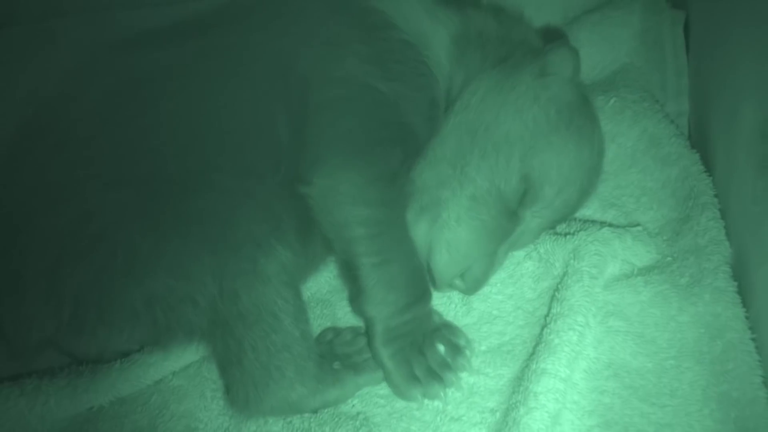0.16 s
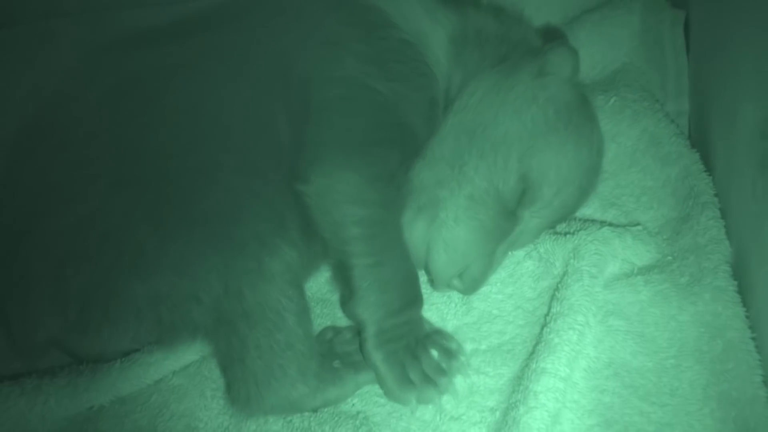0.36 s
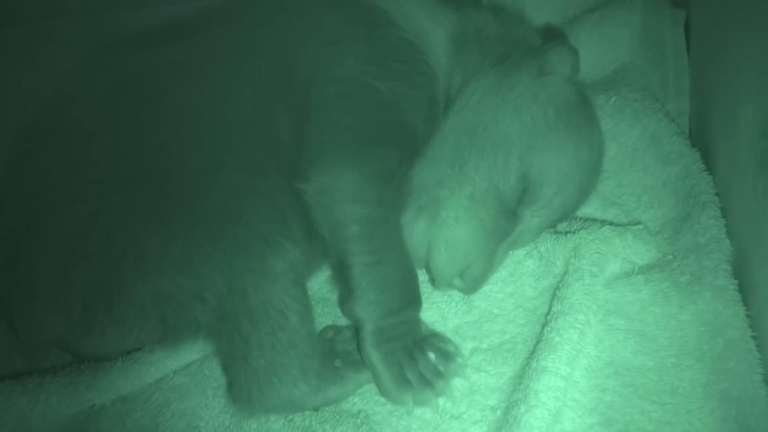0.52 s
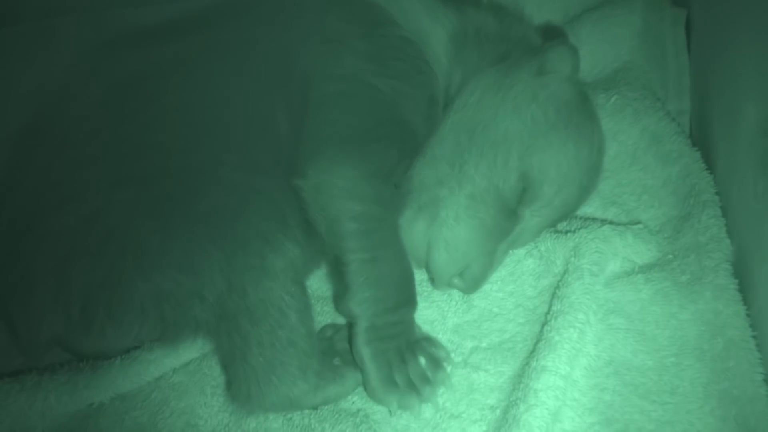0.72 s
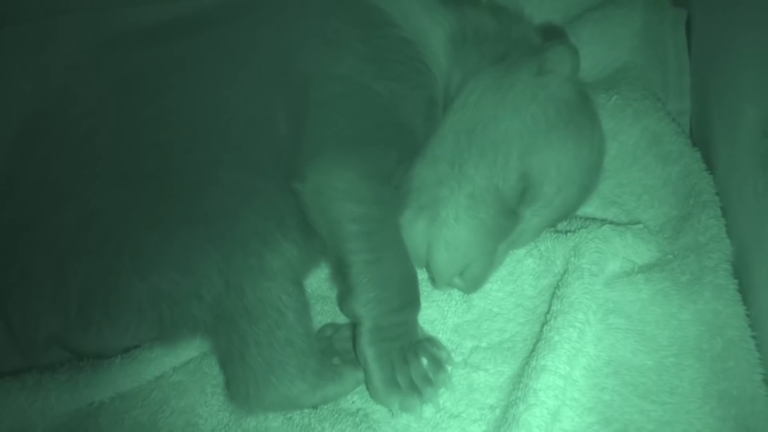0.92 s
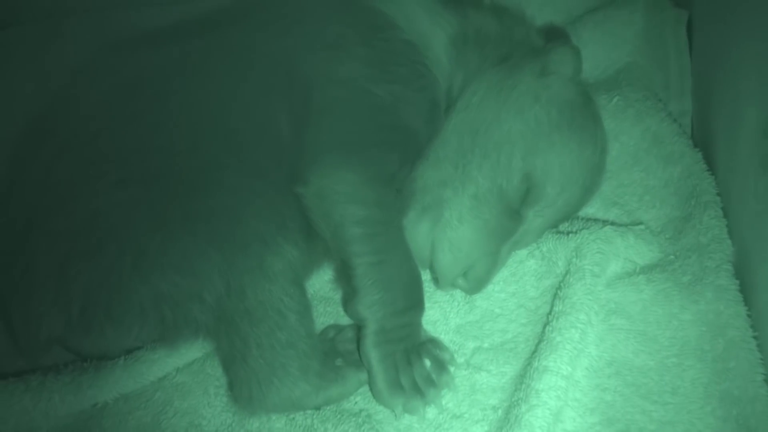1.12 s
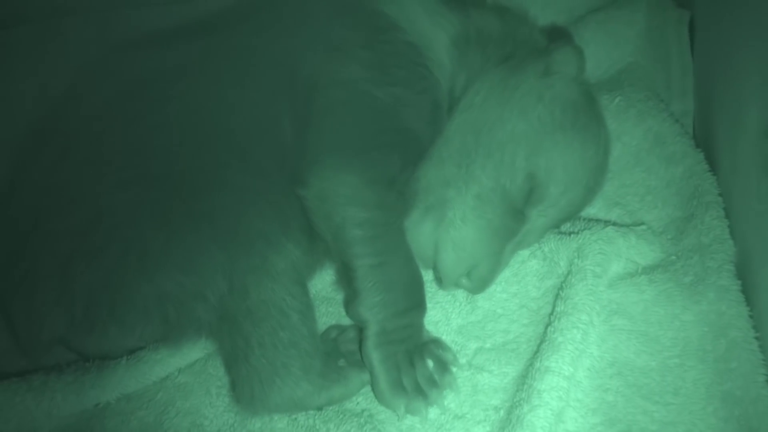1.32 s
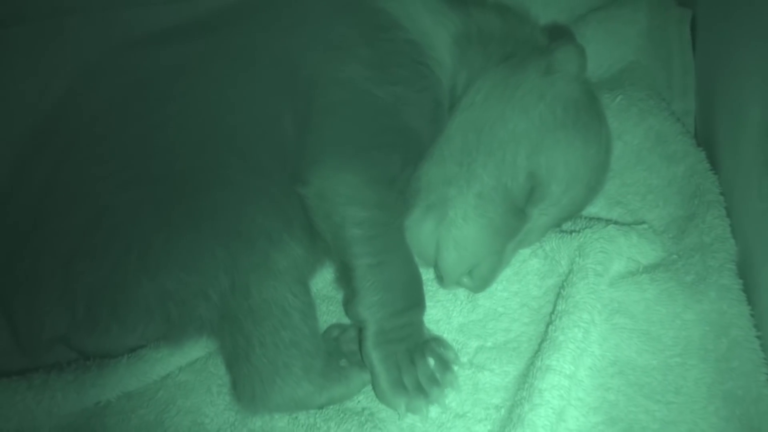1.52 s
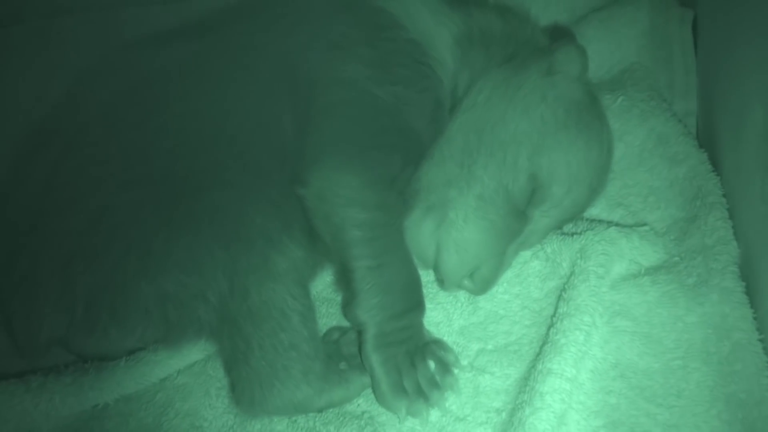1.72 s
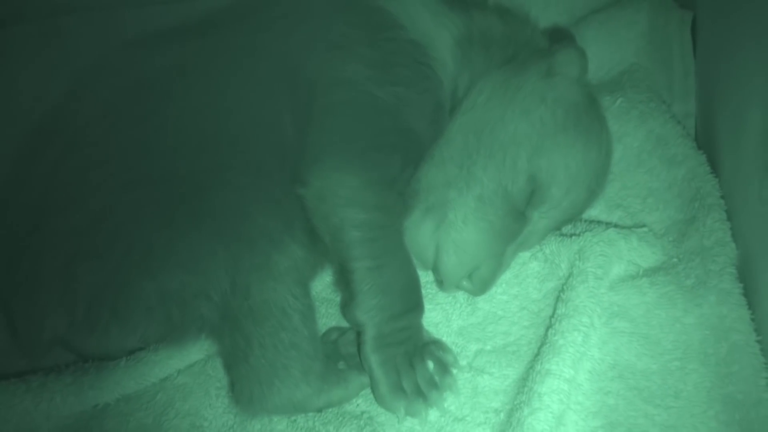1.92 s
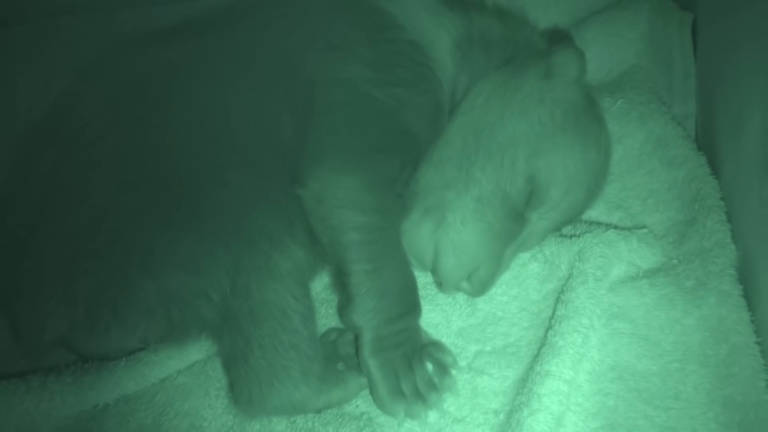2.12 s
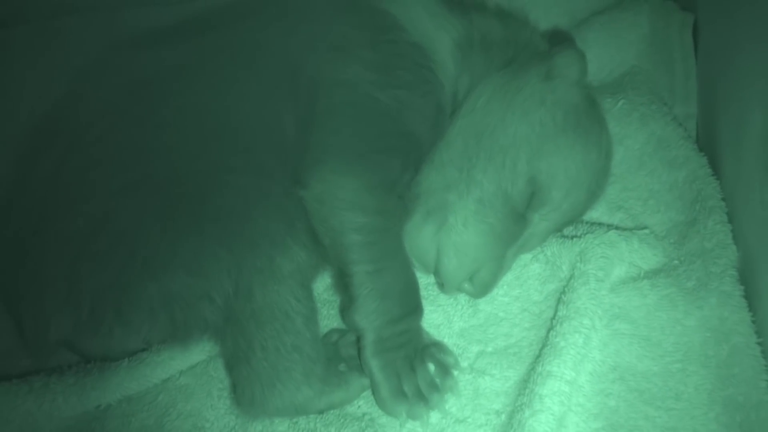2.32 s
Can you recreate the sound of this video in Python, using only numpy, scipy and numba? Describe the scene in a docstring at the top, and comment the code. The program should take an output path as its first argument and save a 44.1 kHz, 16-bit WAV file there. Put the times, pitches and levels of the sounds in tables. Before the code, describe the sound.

A bear cub, close and slightly right, starts with a thin, unsteady whistling squeal from 0 to 0.5 s, cracking hoarsely. It bursts into a louder, nasal, wavering wail, which sinks into a pulsing growl after 1.05 s and dies by 1.4 s. Soft low paw thumps come near 1.1, 1.45, 1.9 and 2.3 s, with faint fur brushing, over quiet room hiss and whine.

```python
"""Bear cub crying in a padded den box

A thin squeal, built from sines, is joined by a higher second tone and the mixing products of the two.
A rough, wavering wail takes over, drops in pitch and dies: uneven harmonics and pulsed breath in vocal bands.
Paws thump the box floor as short low sine bursts with noise tails; filtered noise brushes by as fur.
Shaped noise gives hiss and rumble, narrow noise a faint machine whine. The cub sits close, off to the right.
"""
import sys
import numpy as np
from scipy import signal
from scipy.fft import rfft, irfft
from scipy.io import wavfile
from scipy.ndimage import uniform_filter1d
from numba import njit

SR = 44100
rng = np.random.default_rng(int(sys.argv[2]) if len(sys.argv) > 2 else 0)


def wav_out(sig):
    """Save sig, one row per channel (or a flat mono array), as 16-bit PCM at SR to the path in sys.argv[1]."""
    wavfile.write(sys.argv[1], SR, np.round(np.clip(np.atleast_2d(sig).T, -1, 1) * 32767).astype(np.int16))


N = 103635

# Pitch of the wail. Each row: time in seconds, pitch in Hz.
WAIL_PITCH = [(0.44, 344.4), (0.468, 334.7), (0.518, 312.3), (0.54, 283.5), (0.57, 259.8), (0.6, 281.5),
              (0.624, 286.3), (0.674, 282.2), (0.7, 237.3), (0.736, 262.4), (0.794, 279.9), (0.814, 305.9),
              (0.83, 280), (0.852, 293), (0.914, 301.7), (0.996, 291.9), (1.018, 287), (1.048, 271.4),
              (1.052, 260.4), (1.072, 185.1), (1.086, 176.1), (1.148, 184.9), (1.194, 163.2), (1.23, 165.4),
              (1.265, 156.7), (1.3, 139.1), (1.36, 111)]
# Strong-weak pulses of the growl. Each row: time in seconds, level of the odd partials in dB, mouth width in Hz.
GROWL = [(1.05, 1.5, 310), (1.075, 4, 170), (1.15, -5.5, 176), (1.185, -4.5, 150), (1.25, -5.5, 204.6),
         (1.29, 1.5, 350)]
PATCHY_DB = 2.2  # flicker of the upper partials


def undb(db):
    """Decibels to gain."""
    return 10 ** (np.asarray(db) / 20)


def curve(table, col=1):
    """One column of a time table, interpolated per sample."""
    a = np.array(table, float)
    return np.interp(np.arange(N) / SR, a[:, 0], a[:, col])


def gate(table, fade_s=.004):
    """1 inside the time span of a table, fading to 0 outside."""
    t = np.arange(N) / SR
    inside_s = np.minimum(t - table[0][0], table[-1][0] - t)
    return np.clip(inside_s / fade_s + 1, 0, 1)


def even(x, span_s=0.03):
    """Holds a sound near rms 1 over time."""
    k = int(span_s * SR)
    power = uniform_filter1d(uniform_filter1d(x ** 2, k), k)
    return x / np.sqrt(power + 1e-12)


def noise():
    """White noise."""
    return rng.standard_normal(N)


def walk(rate_hz):
    """Random wander: random steps smoothed over one step length."""
    k = int(SR / rate_hz)
    steps = np.repeat(rng.standard_normal(N // k + 1), k)
    return 1.3 * uniform_filter1d(steps, k)[:N]


def on_log(table, hz):
    """Reads a (Hz, dB) table on a log frequency axis."""
    a = np.array(table, float)
    return np.interp(np.log(hz), np.log(a[:, 0]), a[:, 1])


def pan(x, left_minus_right_db):
    """Places a sound by level difference."""
    g = undb(np.array([[left_minus_right_db / 2], [-left_minus_right_db / 2]]))
    return x * g / g.mean()


@njit
def svf(x, hz, width):
    """State-variable band-pass with moving centre, gain 1 there."""
    y, b, l = np.empty(len(x)), 0., 0.
    for i in range(len(x)):
        g, k = np.tan(np.pi * hz[i] / SR), width / hz[i]
        v = (b + g * (x[i] - l)) / (1 + g * (g + k))
        b, l, y[i] = 2 * v - b, l + 2 * g * v, k * v
    return y


def band(x, hz, width_hz):
    """Band-pass at a fixed or moving centre."""
    return svf(x, hz + np.zeros(N), float(width_hz))


def edges(x, lo_hz, hi_hz, order=4):
    """Butterworth band-pass between fixed edges."""
    return signal.sosfilt(signal.butter(order, [lo_hz, hi_hz], "band", fs=SR, output="sos"), x)


def peak(f, hz, width_hz):
    """Gain of a resonance at frequency f."""
    return 1 / np.sqrt(1 + (2 * (f - hz) / width_hz) ** 2)


def cut(f, hz):
    """Gain that falls steeply above hz."""
    return 1 / (1 + (f / hz) ** 14)


def room_tone():
    """Stereo hiss and rumble from spectrally shaped noise, plus a narrow-band machine whine."""
    # Spectrum of the middle. Each row: frequency in Hz, relative density in dB.
    floor = [(15, -32), (25, -21), (59, 4), (275, -11.5), (314, -0.5), (380, -13), (525, -7), (786, -19),
             (1090, -8.5), (1210, -18.5), (1540, -13), (1720, -18), (1960, -17), (3020, -22),
             (15600, -25.5)]
    # Side against middle. Each row: frequency in Hz, level in dB.
    side_db = [(60, -29), (110, -7), (200, -1), (380, -4.5), (700, 4.5), (1290, -6.5), (2380, -8.5),
               (4400, -9.5), (8120, -1), (11000, -6), (12000, -34.5)]
    # Machine whine. Each row: centre in Hz, width in Hz, level in dB.
    hums = [(1084, 42, -68)]
    floor_db, hum_pan_db = -64.5, 1.8
    f = np.maximum(np.fft.rfftfreq(N, 1 / SR), 1)
    floor_shape_db = on_log(floor, f)
    mid = irfft(rfft(noise()) * undb(floor_shape_db), N)
    side = irfft(rfft(noise()) * undb(floor_shape_db + on_log(side_db, f)), N)
    bed = (mid + side * np.array([[1], [-1]])) * undb(floor_db) / np.std(mid)
    whine = np.zeros(N)
    for hz, width_hz, db in hums:
        narrow = band(band(noise(), hz, width_hz), hz, 2 * width_hz)
        whine += undb(db + 2.0 * walk(9.5)) * even(narrow, 0.76)
    return bed + pan(whine, hum_pan_db)


def rustles():
    """Fur brushing the blanket: band noise that swells and dies."""
    # Each row: start in seconds, peak level in dB, centre in Hz, width in Hz, length in seconds.
    brushes = [(1.458, -65, 1490, 480, 0.077), (1.884, -61.5, 1530, 50, 0.045),
               (2.07, -70, 2820, 1000, 0.062)]
    t, out = np.arange(N) / SR, np.zeros(N)
    for start_s, db, hz, width_hz, length_s in brushes:
        u = np.maximum(t - start_s, 0) / length_s
        swell = np.e * u * 4 * np.exp(-4 * u)  # reaches 1 at a quarter of the length
        out += undb(db) * swell * even(band(noise(), hz, width_hz), 0.091)
    return out


def squeak():
    """A faint, very high sine whose pitch and level arch up and down."""
    middle_s, half_length_s, level_db = 2.085, .09, -79
    top_hz, end_drop_hz = 11800, 650
    u = np.clip((np.arange(N) / SR - middle_s) / half_length_s, -1, 1)
    phase = np.cumsum(top_hz - end_drop_hz * u ** 2) / SR
    return undb(level_db) * (1 - u ** 2) * np.sin(2 * np.pi * phase)


def thumps():
    """Soft paw blows: a couple of low sine cycles, then a decaying low noise tail of the box."""
    # Each row: start in seconds, level in dB, pitch in Hz.
    blows = [(1.003, -46, 111), (1.112, -36.5, 105), (1.451, -34.5, 105), (1.483, -46, 123.5),
             (1.9, -39.5, 118), (1.936, -52, 94), (1.955, -42, 121), (2.328, -40, 116)]
    rise_s, fall_s = .012, .008
    tail_db, tail_rise_s, tail_t60_s = -14.5, 0.013, 0.28
    out, tail_level, t = np.zeros(N), np.zeros(N), np.arange(N) / SR
    for start_s, db, hz in blows:
        u = np.maximum(t - start_s, 0)
        rise = np.sin(np.pi / 2 * u / rise_s)
        fall = np.exp(-((u - rise_s) / fall_s) ** 2 / 2)
        out += undb(db) * np.where(u < rise_s, rise, fall) * np.sin(2 * np.pi * hz * u)
        tail_level += undb(db) * (1 - np.exp(-u / tail_rise_s)) * undb(-60 * u / tail_t60_s)
    return out + undb(tail_db) * tail_level * even(edges(noise(), 40, 85, order=1), 0.22)


def tone(hz):
    """A slightly wavering sine, coloured by head and box, flickering more at high pitch."""
    # Response of head and box. Each row: frequency in Hz, gain in dB.
    head = [(1000, 0), (2200, -3), (2700, -14), (3300, -32), (3900, -18), (5000, -14), (5800, -7.5),
            (6350, -21.5), (6750, -19.5), (7300, -52), (9000, -49)]
    flicker_db = PATCHY_DB * np.clip(hz / 2000 - 1, 0, 1) * walk(31.6)
    phase = np.cumsum(hz * (1 + 0.0013 * walk(61.8))) / SR
    return np.sqrt(2) * undb(on_log(head, hz) + flicker_db) * np.sin(2 * np.pi * phase)


def squeal():
    """A high whistle of the folds, a second tone above it, their mixing products and a faint wheeze."""
    # Whistle, second tone and wheeze. Each row: time in seconds, pitch in Hz, level in dB.
    whistle, second, wheeze = [(0.07, 1655, -41), (0.078, 1693, -43), (0.138, 1668, -43),
                               (0.214, 1610, -32), (0.246, 1466, -41), (0.3, 1351, -32.5),
                               (0.346, 1329, -35.5), (0.354, 1286, -32.5), (0.364, 1286, -41),
                               (0.394, 1383, -35.5), (0.414, 1438, -40.5), (0.438, 1427, -36),
                               (0.468, 1380, -38.5), (0.48, 1210, -43), (0.49, 1340, -49)], [(0.13, 1953, -55.5), (0.158, 2097, -50.5),
                                               (0.21, 2090, -52.5), (0.244, 1933, -34.5),
                                               (0.27, 1786, -43.5), (0.34, 1629, -41), (0.374, 1680, -47),
                                               (0.418, 1782, -43), (0.456, 1744, -42), (0.498, 1596, -33.5),
                                               (0.51, 1468, -41)], [(0, 1246, -59.5), (.05, 1300, -54),
                                                               (.07, 1257, -58.5), (.24, 1326, -55.5),
                                                               (.28, 1300, -47)]
    # Level of each harmonic in dB, from the fundamental up.
    whistle_db, wheeze_db = [0.5, -9, -12, -20.5, -15], [-4, -6, -5, -11.5]
    # Level of high partials and mixing products. Each row: time in seconds, level in dB.
    clear_db = [(.2, 0), (.25, -4), (.29, 1), (.342, 1), (.356, -9), (.39, -7), (.405, 2), (.45, 1),
                (.48, -6)]
    # Noise in the second tone. Each row: time in seconds, share 0-1.
    second_fuzz = [(.14, .8), (.165, .12), (.34, .1), (.36, .7), (.39, .1)]
    whistle_noise_db, mixing_db, blur_db = -33, -17, -29
    hz, level = curve(whistle), undb(curve(whistle, col=2)) * gate(whistle, 0.00071)
    upper_hz, upper_level = curve(second), undb(curve(second, col=2)) * gate(second, 0.03)
    clear, fuzz = undb(curve(clear_db)), curve(second_fuzz)

    harmonics = sum(undb(db) * tone(k * hz) * (clear if k > 1 else 1) for k, db in enumerate(whistle_db, 1))
    out = level * (harmonics + undb(whistle_noise_db) * even(band(noise(), hz, 330)))
    fuzzy = even(band(band(noise(), upper_hz, 250), upper_hz, 270))
    out = out + upper_level * (np.sqrt(1 - fuzz ** 2) * tone(upper_hz) + fuzz * fuzzy)
    orders = [(2, 1), (1, 2), (3, 1), (0, 3), (2, 2)]  # multiples of whistle and second tone
    mixing = sum(tone(a * hz + b * upper_hz) for a, b in orders)
    blur = even(edges(noise(), 4200, 6000, order=2))
    out = out + upper_level * (undb(mixing_db) * clear * mixing + undb(blur_db) * blur)
    faint = sum(undb(db) * tone(k * curve(wheeze)) for k, db in enumerate(wheeze_db, 1))
    return out + faint * undb(curve(wheeze, col=2)) * gate(wheeze, 0.021)


def beating():
    """The whistle returns inside the wail: narrow noise chopped at the wail's pitch, unsteady in level."""
    # Each row: time in seconds, centre in Hz, level in dB.
    whistle_again = [(.53, 1402, -43), (.57, 1401, -42), (.59, 1292, -35), (.605, 1388, -42),
                     (.625, 1468, -41), (.7, 1315, -45.5), (.885, 1315, -43), (.91, 1278, -39),
                     (.945, 1374, -36.5), (.958, 1320, -40), (.975, 1258, -40), (1.005, 1246, -38.5),
                     (1.04, 1280, -43)]
    chop = 1 + np.cos(2 * np.pi * np.cumsum(curve(WAIL_PITCH)) / SR)
    level = undb(curve(whistle_again, col=2) + 2.0 * walk(56.65)) * gate(whistle_again, 0.044)
    return chop * even(band(noise(), curve(whistle_again), 22)) * level


def hoarse_break(puff):
    """The voice breaks inside the squeal: pulsed breath in two bands over a low noise groan."""
    # Each row: time in seconds, level in dB.
    break_db = [(.3, -68), (.325, -58.5), (.345, -52), (.356, -49.5), (.39, -51), (.402, -68), (.43, -68),
                (.45, -53)]
    groan_db, hiss_db = -4, -13
    rasp = even(edges(puff, 610, 2000, order=2))
    hiss = undb(hiss_db) * even(edges(puff, 3500, 4800, order=2))
    groan = undb(groan_db) * even(edges(noise(), 112.5, 142, order=2), .1)
    return (rasp + hiss + groan) * undb(curve(break_db)) * gate(break_db, 0.024)


def wail_partials(k, f, phase, halved, odd_db):
    """Harmonics of the vocal pulses with frequency-dependent lag; they drift and flicker separately."""
    throat_lag_rad, growl_scatter_rad = 1.3, 1.3  # throat lag at 1 kHz
    drift = np.array([walk(12) for _ in k]) * np.clip(f / 700, 0, 1)
    lag = throat_lag_rad * np.minimum(f / 1000, 2) ** 2
    lag = lag + growl_scatter_rad * np.maximum(halved, .15) * drift
    lines = -np.cos(2 * np.pi * k * phase - lag) * undb(odd_db * (k % 2))
    flicker = np.array([walk(40) for _ in k])
    return lines * undb(PATCHY_DB * np.clip(f / 1000 - .5, .2, 1) * flicker)


def wail():
    """Uneven vocal pulses and pulsed breath through chest, mouth, nose, treble and air bands."""
    # Each row: time in seconds, chest level in dB, mouth resonance in Hz, mouth level in dB.
    wail_low = [(0.32, -70, 980, -84), (0.366, -50, 990, -49.5), (0.394, -47, 970, -62),
                (0.424, -70, 674, -66.5), (0.462, -77.5, 700, -35), (0.504, -30, 940, -30),
                (0.524, -26.5, 875, -29.5), (0.537, -28.5, 870, -29.5), (0.545, -39.5, 845, -43.5),
                (0.56, -40, 590, -37.5), (0.578, -44.5, 690.4, -47.5), (0.605, -42, 880, -41),
                (0.62, -38.5, 850, -38.5), (0.65, -37.5, 810, -36.5), (0.698, -38, 566, -37),
                (0.74, -40.5, 845, -46.5), (0.78, -32.5, 820, -41.5), (0.804, -31.5, 840, -28.5),
                (1.016, -32.5, 717, -27), (1.038, -30.5, 696, -35.5), (1.072, -32, 840, -30),
                (1.114, -33.5, 1000, -28.5), (1.145, -30.5, 1030, -31), (1.18, -30.5, 645, -29.5),
                (1.226, -25.5, 620, -27.5), (1.27, -27.5, 684, -34), (1.35, -47, 584.5, -57.5),
                (1.39, -66.5, 700, -62.5)]
    # Each row: time in seconds, nose level in dB, nose resonance in Hz, treble level in dB.
    wail_high = [(0.44, -47.5, 1420, -61.5), (0.49, -36.5, 1490, -57.5), (0.56, -36, 1360, -55.5),
                 (0.58, -42, 1320, -64), (0.63, -32.5, 1440, -58), (0.708, -36, 1260, -60.5),
                 (0.784, -30.5, 1360, -58), (0.802, -38.5, 1360, -56.5), (0.88, -40, 1550, -56),
                 (0.986, -42, 1340, -53), (1.052, -35, 1330, -52.5), (1.084, -38.5, 1370, -59.5),
                 (1.14, -36, 1171, -55.5), (1.18, -34, 1070, -65.5), (1.228, -34.5, 989, -55.5),
                 (1.252, -33.5, 980, -67), (1.3, -52.5, 1010, -74), (1.39, -67, 1530, -80)]
    # Upper nasal resonance. Each row: time in seconds, relative level in dB, centre in Hz.
    upper_nose = [(.44, -18, 1940), (.55, -2.5, 1910), (.6, -17, 2020), (.66, -9.5, 1960),
                  (.79, -10.5, 1900), (.835, -0.5, 2030), (.86, 5, 1760), (1.0, -5, 1900), (1.04, -7, 1930),
                  (1.12, -7.5, 1930), (1.16, -8, 1890), (1.2, -2, 1700), (1.3, -5, 1560)]
    # Air band. Each row: time in seconds, level in dB.
    air_db = [(.44, -84), (.55, -78), (.8, -68), (1.25, -67), (1.39, -74.5)]
    # Each row: time in seconds, roughness 0-1.
    roughness = [(.34, .9), (.44, .6), (.455, .3), (.474, .35), (.488, .85), (.505, .08), (.55, .15),
                 (.575, .8), (.605, .8), (.62, .12), (.68, .1), (.692, .75), (.715, .06), (.85, .07),
                 (1.04, .08), (1.06, .7), (1.09, .2), (1.135, .15), (1.155, .5), (1.19, .15), (1.24, .15),
                 (1.275, .6), (1.36, .75)]
    jitter, shimmer_db = .05, 4.0  # pitch share and level spread at full roughness
    halved_hz, half_bass_db = 205, -14  # strong and weak pulses alternate under this pitch
    chest_min_hz, chest_width_hz, mouth_width_hz, nose_width_hz = 331, 63, 450, 95
    mouth_top_hz, nose_top_hz = 1080, 2393
    nose_breath, treble_breath = .06, .6  # shares 0-1; the nose adds its own to the roughness
    rumble_db = -29  # the body shakes the box floor, relative to the chest

    hz, rough = curve(WAIL_PITCH), curve(roughness)
    phase = np.cumsum(hz * (1 + jitter * rough * walk(200))) / SR
    shimmer = undb(shimmer_db * rough * walk(180))
    puff = np.exp(-(phase % 1) / 1.4) * noise()  # breath decays within each pulse
    k = np.arange(1, 45)[:, None]
    f, halved, odd_db = k * hz, np.clip((halved_hz - hz) / 40, 0, 1), curve(GROWL)
    lines = wail_partials(k, f, phase, halved, odd_db)
    mouth_hz, nose_hz = curve(wail_low, col=2), curve(wail_high, col=2)
    chest_hz = np.maximum(hz, chest_min_hz)

    def voiced(gain, breath, share):
        """Shaped harmonics traded for a share of breath, rms near 1 before shares."""
        share = np.clip(share, 0, 1)
        clean = even(shimmer * np.sum(lines[:len(gain)] * gain, axis=0))
        return np.sqrt(1 - share ** 2) * clean + share * even(breath)

    low = f[:18]
    half_bass = undb(half_bass_db - odd_db) * halved * (k[:18] == 1)
    chest_breath = band(band(puff, chest_hz, 150), chest_hz, 150)
    chest = voiced(peak(low, chest_hz, chest_width_hz) ** 2 + half_bass, chest_breath, rough)

    mouth_gain = peak(low, mouth_hz, curve(GROWL, col=2))
    mouth_gain = mouth_gain * cut(low, mouth_top_hz + 120 * halved) * (1 - cut(low, 364))
    mouth_breath = edges(band(puff, mouth_hz, mouth_width_hz), 510, 1350, order=2)
    mouth = voiced(mouth_gain, mouth_breath, rough)

    nose_gain = peak(low, nose_hz, nose_width_hz * (1 + 2 * halved))
    nose_gain = nose_gain + undb(curve(upper_nose)) * peak(low, curve(upper_nose, col=2), 120)
    nose_gain = nose_gain * cut(low, nose_top_hz) * (1 - cut(low, mouth_top_hz - 170 * halved))
    nose = voiced(nose_gain, edges(band(puff, nose_hz, 450), 1125, 1960, order=2), rough + nose_breath)

    treble_gain = peak(f, 4100, 1900) * cut(f, 6970) * (1 - cut(f, 4570))
    treble = voiced(treble_gain, edges(band(puff, 6260, 3200), 2900, 6440, order=3), treble_breath)
    air = even(edges(puff + 2.2 * noise(), 6400, 11100, order=1))
    rumble = undb(rumble_db) * even(edges(noise(), 103.0, 137, order=2), 0.18)

    lower = (chest + rumble) * undb(curve(wail_low)) + mouth * undb(curve(wail_low, col=3))
    upper = nose * undb(curve(wail_high)) + treble * undb(curve(wail_high, col=3))
    upper = upper + air * undb(curve(air_db))
    return gate(wail_low, 0.076) * lower + gate(wail_high, 0.2) * upper + hoarse_break(puff)


def box(x):
    """Short echo of the den walls: decaying noise tails, a little different left and right."""
    t60_s, echo_db = .2, -17
    t = np.arange(int(.3 * SR)) / SR
    tails = rng.standard_normal((2, len(t))) * undb(-60 * t / t60_s) * (t > .004)
    tails[1] = .9 * tails[0] + .3 * tails[1]
    tails /= np.sqrt(np.sum(tails ** 2, axis=1, keepdims=True))
    return undb(echo_db) * np.array([signal.fftconvolve(x, h)[:N] for h in tails])


def scene():
    """Cub with box echo, placed by frequency; paws, blanket, squeak and room around it."""
    # Band edges in Hz of a gap in the wail's spectrum.
    gap_hz = [2856, 3870]
    # Place of the cub. Each row: frequency in Hz, left minus right in dB.
    cub_pan = [(60, -10), (110, 3), (200, -5), (1290, -5.5), (2380, -2.5), (4400, -3.5), (8120, -4),
               (15000, 0.5)]
    thump_pan_db = 1.5
    gap = signal.butter(2, gap_hz, "bandstop", fs=SR, output="sos")
    cub = signal.sosfilt(gap, wail() + beating()) + squeal()
    f = np.maximum(np.fft.rfftfreq(N, 1 / SR), 1)
    g = undb(np.array([[.5], [-.5]]) * on_log(cub_pan, f))
    placed = irfft(rfft(cub + box(cub)) * g / g.mean(axis=0), N)
    return placed + pan(thumps() + rustles() + squeak(), thump_pan_db) + room_tone()


def record(dry):
    """The recorder cuts the top with a steep elliptic low-pass."""
    top_hz = 15450
    return signal.sosfilt(signal.ellip(10, .2, 80, top_hz, fs=SR, output="sos"), dry)


dry = scene()
out = record(dry)
wav_out(out)
```